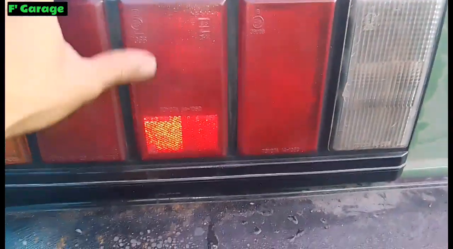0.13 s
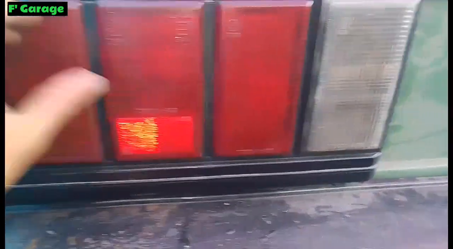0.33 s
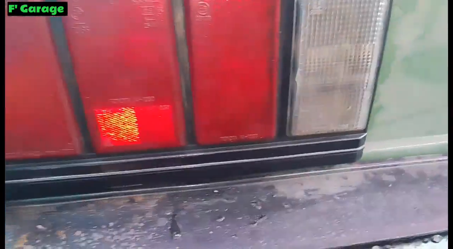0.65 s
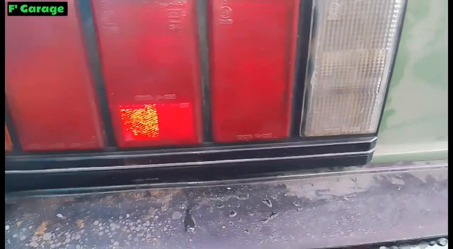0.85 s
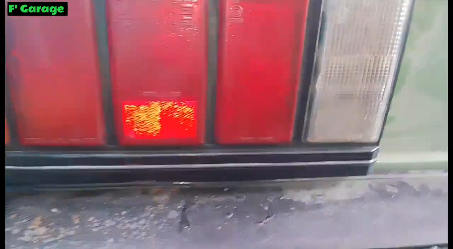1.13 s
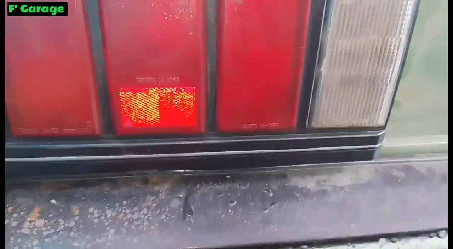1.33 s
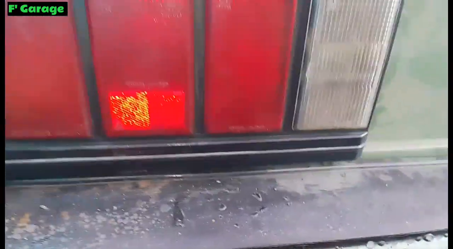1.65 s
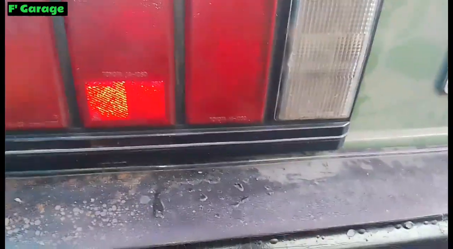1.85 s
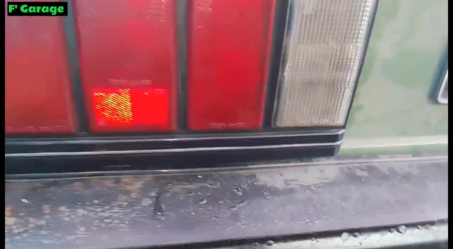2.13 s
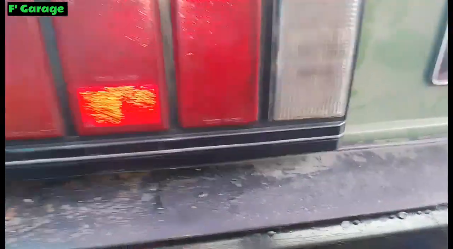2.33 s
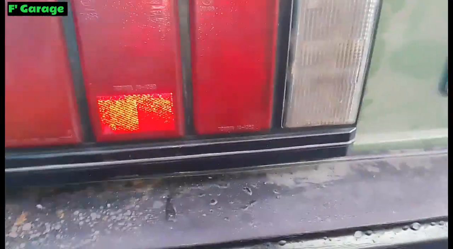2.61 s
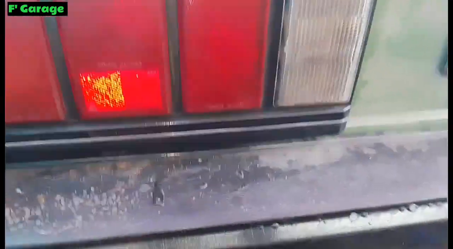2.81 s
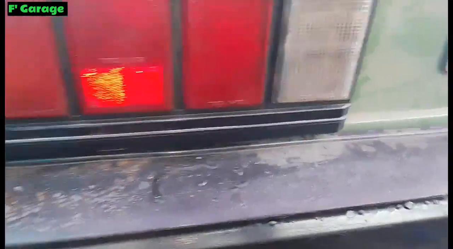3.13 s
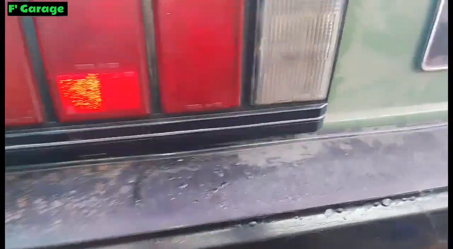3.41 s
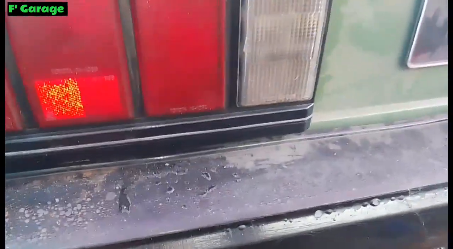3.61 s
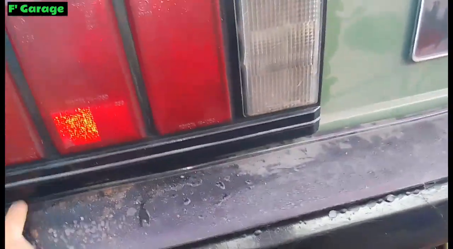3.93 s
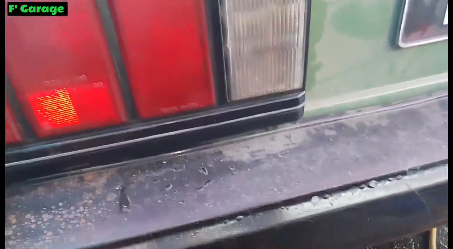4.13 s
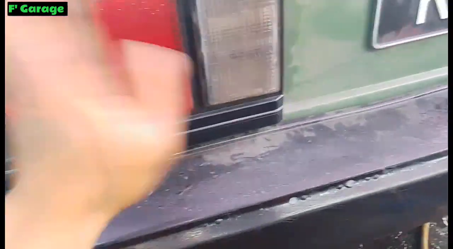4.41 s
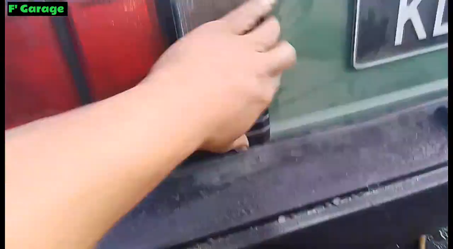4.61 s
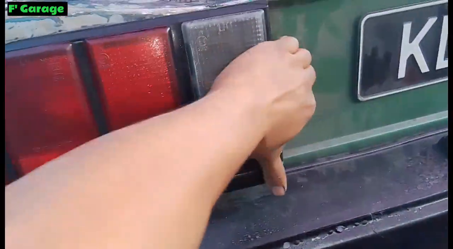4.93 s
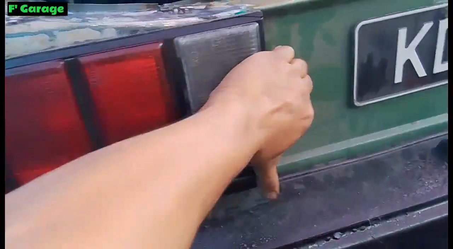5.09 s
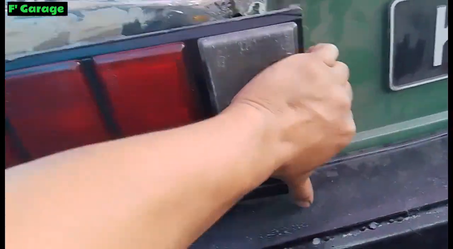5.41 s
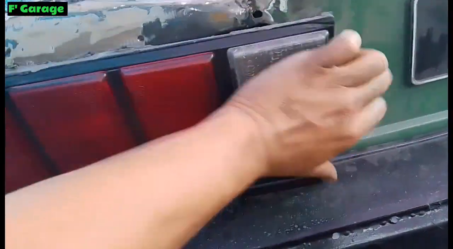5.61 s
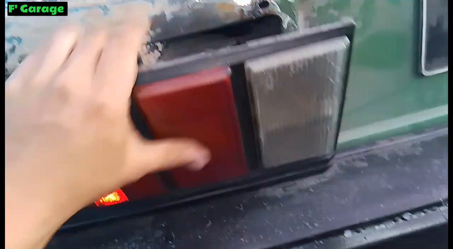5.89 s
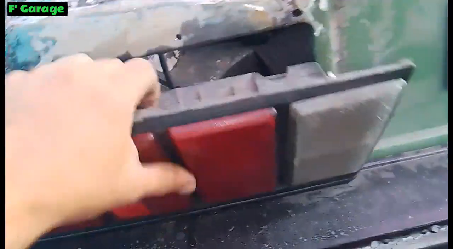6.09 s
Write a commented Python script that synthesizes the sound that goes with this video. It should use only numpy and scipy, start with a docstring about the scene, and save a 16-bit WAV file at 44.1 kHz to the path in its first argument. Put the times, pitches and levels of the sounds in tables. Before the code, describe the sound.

Close to the microphone, a hand knocks and prises a hollow plastic tail-light unit on a car's metal panel. Light clicks come first, then uneven clusters of sharp cracks, gritty creaks and dull bumps, busiest midway. After a quieter gap, another strong burst of creaks arrives, then only faint bumps and brushing. Short garage echoes follow the blows, over soft hiss and very faint low hum.

```python
"""Prising off a tail light

A hand knocks and prises at a plastic tail-light unit until it comes loose from a car's rear panel.
Clicks, creaks and bumps are runs of tiny slips that ring the lens, its housing and the sheet metal.
In between, the hand brushes softly: swells of grainy hiss. A garage echoes the blows with decaying noise.
Low wavering tones hum under a soft hiss, and the close microphone overloads on the hardest blows."""
import sys
import numpy as np
from scipy import signal
from scipy.fft import rfft, irfft
from scipy.io import wavfile
from scipy.ndimage import uniform_filter1d

SR = 44100
rng = np.random.default_rng(int(sys.argv[2]) if len(sys.argv) > 2 else 0)


def put_to_file(sound):
    """Save the sound as 16-bit audio at rate SR, in the file named by the first command-line argument."""
    columns = np.atleast_2d(sound).T  # one column per channel
    safe = np.clip(columns, -1, 1)
    whole_steps = np.round(safe * 32767)
    wavfile.write(sys.argv[1], SR, whole_steps.astype(np.int16))


N = 275832  # length of the scene in samples
TOP_HZ = 15300  # the highest pitch that gets through

# Colour of the steady hiss. Each row: pitch in Hz, relative level in dB per Hz.
AIR_COLOUR = [(30, 4), (100, -9.5), (160, -8.5), (400, -16.5), (750, -16.5), (1350, -23.5), (2050, -15),
              (2600, -26), (3200, -26), (4800, -18), (6400, -21), (7600, -33.5), (9500, -43),
              (15000, -47.5)]
AIR_DB = -47.5  # level of that hiss before it swells
# Low hum, like an engine idling far off. Each row: pitch in Hz, rms level in dB before it wavers.
HUM_TONES = [(23.7, -52), (47.5, -71), (71, -58.5), (143, -60.5)]
# How the garage rings in each pitch range. Each row: pitch in Hz, time to fall 60 dB in seconds,
# relative level in dB.
GARAGE_DECAY = [(100, 0.51, 1), (247, 0.3, 5), (680, 0.21, 5), (1870, 0.18, 2.5), (4900, 0.35, -7),
                (13000, 0.15, -0.5)]
# Soft strokes of the hand. Each row: middle in seconds, half length in seconds, level in dB,
# level of the fine top hiss in dB relative to the stroke.
BRUSH_STROKES = [(1.46, 0.058, -44, -34), (4.003, 0.03, -41.5, -18.5), (4.823, 0.029, -42.5, -27),
                 (4.983, 0.031, -34, -24), (5.804, 0.062, -50.5, -16), (6.007, 0.047, -58, -9)]
# Colour of the brushing. Each row: pitch in Hz, relative level in dB per Hz.
BRUSH_COLOUR = [(80, -11), (400, 5), (1000, -7.5), (1900, 3.5), (3000, -10.5), (5200, -0.5), (6600, -6.5),
                (8500, -28), (14000, -38)]
# Clearest ringing tones of the lamp unit in its panel. Each row: pitch in Hz, relative level in dB,
# time to fall 60 dB in seconds.
CLEAR_MODES = [(79.3, 1.5, 0.13), (154.3, -4, 0.19), (271.4, -12, 0.59), (336.2, 2, 0.13),
               (469, -13.5, 0.31), (564, -7, 0.073), (646, -7.5, 0.19), (760.2, -4.5, 0.097),
               (960, -13.5, 0.063), (1094, -47, 0.29), (1484, -20, 0.32), (1865, 6, 0.03), (1960, -4, 0.19),
               (2080, 2.5, 0.04), (2313, -14, 0.071), (3780, 0.5, 0.083), (4800, 5, 0.04),
               (4780, -4, 0.033), (4830, -8, 0.037), (5160, 5, 0.03), (4950, 9, 0.024), (5683, -5, 0.052),
               (6600, 7, 0.019)]
# Colour of its many overlapping short tones. Each row: pitch in Hz, relative level in dB per Hz.
DENSE_COLOUR = [(50, -19), (110, -3), (340, -1.5), (520, -9), (950, -4), (1200, -15), (1600, -8.5),
                (2100, -4.5), (2550, -15), (3300, -14), (4900, -5), (6700, -11), (8200, -22.5),
                (15000, -35.5)]
# Borders between thud, knock, clack, lens and snap. One column: pitch in Hz.
PART_EDGES_HZ = [45, 180, 450, 1300, 2900, 15500]
# How panel thud, shell knock, housing clack, lens and edge snap share a blow. Each row: share in dB,
# dB gained per dB of weight, most dB gained when the struck spot lies on the part.
PART_SHARES = [(-13.5, 1.1, 2.5), (-8, 0.86, 4), (-5.5, 0.36, 6), (-0.36, 0.0648, 2.5), (-2, 0, 0.5)]
SPOT_REACH_OCTAVES = 0.82  # how far from its own pitch a struck spot favours a part
# A blow lighter than a firm one is softer too, so more of it goes into the heavy parts.
FIRM_DB, SOFTENING_DB_PER_DB = -21.5, 0.3583
# Dull bumps of the hand, or of the unit settling on its seal. Each row: start in seconds,
# length in ms, pitch of the struck spot in Hz, level in dB before the parts share it.
DULL_BUMPS = [(0.636, 53, 196, -52), (1.092, 9.7, 456, -24.5), (1.826, 3.8, 1950, -34),
              (2.091, 13.7, 365, -40.5), (2.205, 2.4, 343, -32.5), (2.214, 24.5, 150, -37),
              (2.341, 7.4, 338, -33.5), (2.374, 3.8, 330, -28.5), (2.443, 5.9, 613, -22),
              (2.661, 12, 434, -43), (3.569, 14, 110, -20), (4.249, 3.2, 260, -35),
              (5.75, 26.4, 854, -40.5), (5.853, 20, 700, -45), (5.898, 3, 260, -51), (5.947, 2.8, 820, -49),
              (6.04, 3.1, 834, -49)]
BUMP_WEIGHT_DB, BUMP_SNAP_DB = 3.5, -8  # a padded contact pushes deep and hardly stirs the lens edges
# Creaks as the unit is prised along its mounts. Each row: start in seconds, length of slipping in ms,
# pitch of the struck spot in Hz, level in dB before the parts share it, weight of the hand in dB.
MOUNT_CREAKS = [(1.054, 22, 456, -20, 3), (1.068, 26, 1990, -12.5, -10.5), (1.578, 27.3, 368, -13.5, 1.5),
                (2.381, 14, 725, -28.5, 0), (2.395, 17.5, 2020, -9, -2), (2.417, 11, 636, -19, -4),
                (2.43, 7.2, 635, -15, -7), (2.512, 16.7, 380, -28, 5), (2.74, 11, 770, -18, 1),
                (2.833, 20, 330, -13, 0.5), (3.099, 19, 333, -19, 1), (3.212, 28, 290, -25, 0.5),
                (3.41, 42, 190, -22.5, 2.5), (3.457, 17, 2030, -14, 2), (3.537, 9, 900, -15, -11),
                (3.547, 19.8, 1920, -13, -1.5), (4.312, 12.4, 338, -18, 1.5), (4.984, 17, 800, -25.5, 0.5),
                (5.051, 7.6, 656, -14.5, 2), (5.216, 13, 680, -14, 3.5), (5.226, 29.6, 717, -12, 3),
                (5.252, 23.6, 620, -10, -1), (5.463, 21, 344, -29, -2.5)]
# Sharp clicks of plastic catching on an edge. Each row: start in seconds, pitch of the struck spot in Hz,
# level in dB before the parts share it, weight of the hand behind it in dB.
SHARP_CLICKS = [(0.271, 2020, -28, -8.5), (0.287, 620, -38.5, 0.5), (0.305, 1960, -30.5, -12),
                (0.315, 450, -45.5, 5.5), (1.196, 1980, -36, -1), (1.264, 1980, -40, 0.5),
                (1.548, 845, -32, 0), (1.572, 330, -25.5, 0.5), (2.504, 318, -24, 0),
                (2.545, 297, -22.5, -5.5), (2.702, 2120, -24.5, 0), (2.7304, 785, -13, 0.5),
                (2.756, 750, -18, 5.5), (2.8276, 885, -15.5, -11), (2.878, 345, -26, -6),
                (3.089, 344, -19.5, -4), (3.202, 230, -27.5, 1.5), (3.243, 720, -29.5, 2),
                (3.265, 595, -24, -17.5), (3.386, 815, -36, 6.5), (3.401, 785, -19, -25),
                (3.51, 940, -32, 9), (4.27, 320, -36, -2), (4.302, 402, -16.5, -9), (4.338, 550, -22, -1),
                (4.976, 760, -21.5, -0.5), (5.457, 610, -24.5, 2.5), (5.486, 350, -23.5, 0)]
CLICK_MS = 3.5  # a click is over after a few slips


def undb(db):
    """Turn decibels into a gain."""
    return 10 ** (np.asarray(db) / 20)


def rms(x):
    """Root mean square: the average strength of a sound."""
    return np.sqrt(np.mean(x ** 2) + 1e-18)


def lookup(hz, points):
    """Read between (Hz, value) points on a log-pitch axis."""
    f, value = np.transpose(points)
    return np.interp(np.log(np.maximum(hz, 1)), np.log(f), value)


def colour(x, points, size=2048):
    """Filter a sound to a given spectrum, with no sound ahead of its cause."""
    hz = np.arange(size // 2 + 1) * SR / size
    cepstrum = irfft(np.log(undb(lookup(hz, points))))
    # folding the cepstrum forward makes the filter minimum-phase
    cepstrum[1:size // 2] *= 2
    cepstrum[size // 2 + 1:] = 0
    impulse = irfft(np.exp(rfft(cepstrum)))
    return signal.fftconvolve(x, impulse)[:len(x)]


def band(lo_hz, hi_hz, order=3):
    """Make a filter that passes only the pitches between two limits."""
    return signal.butter(order, [lo_hz, min(hi_hz, SR / 2 - 1)], "band", fs=SR, output="sos")


def fade(t, t60):
    """Die away by 60 dB in t60 seconds."""
    return np.exp(-np.log(1000) * t / t60)


def walk(rate):
    """Smooth random drift with a spread near 1 and about `rate` new values a second."""
    k = int(SR / rate)
    steps = np.repeat(rng.standard_normal(N // k + 1), k)
    return uniform_filter1d(steps, k)[:N]


def add(out, start, sound):
    """Mix a sound in at its start time in seconds."""
    at = int(start * SR)
    piece = sound[:len(out) - at]
    out[at:at + len(piece)] += piece


def background(swell_db=2.9, waver_db=-5.0, wander_hz=0.38):
    """Soft, nearly steady coloured noise over low tones that drift in pitch and level."""
    air = colour(rng.standard_normal(N), AIR_COLOUR)
    air_level = undb(AIR_DB + swell_db * walk(4.1))
    air = air * air_level / rms(signal.sosfilt(band(123, TOP_HZ), air))
    hum = 0
    for hz, db in HUM_TONES:
        level = undb(db + waver_db * walk(5.7))
        phase = 2 * np.pi * np.cumsum(hz + wander_hz * walk(3.69)) / SR
        hum = hum + level * np.sin(phase)
    return air + np.sqrt(2) * hum  # a sine peaks at root 2 times its rms


def garage(count, wet_db=-9.5, build_s=0.00073, late_db=-27, late_t60=1.0):
    """Echo patterns, one a blow as hand and microphone move: they build up fast, and a faint tail lingers."""
    t = np.arange(int(0.6 * SR)) / SR
    edges = 40 * 2 ** np.arange(10)  # octave bands, Hz
    # each blow takes its own stretch of noise
    picks = rng.integers(0, N - len(t), count)[:, None] + np.arange(len(t))
    hz, *columns = np.transpose(GARAGE_DECAY)
    echoes = 0
    for lo, hi in zip(edges, edges[1:]):
        middle = np.log(lo * hi) / 2
        t60, db = (np.interp(middle, np.log(hz), column) for column in columns)
        decay = undb(db) * (fade(t, t60) + undb(late_db) * fade(t, late_t60))
        noise = signal.sosfilt(band(lo, hi), rng.standard_normal(N))
        echoes = echoes + noise[picks] * decay
    echoes = echoes * (1 - np.exp(-(t / build_s) ** 2))
    return undb(wet_db) * echoes / np.linalg.norm(echoes, axis=1, keepdims=True)


def brushing(grain_db=3, grain_rate=150, top_hz=8000):
    """Skin slides lightly: a grainy hiss swells and fades, with a finer hiss set for each stroke."""
    t = np.arange(N) / SR
    middle, half, db, top_db = np.transpose(BRUSH_STROKES)[:, :, None]
    strokes = undb(db) * np.exp(-((t - middle) / half) ** 2 / 2)
    grains = rng.standard_normal(N) * undb(grain_db * walk(grain_rate))
    hiss = colour(grains, BRUSH_COLOUR)
    top = signal.sosfilt(band(top_hz, TOP_HZ), grains)
    main_level = strokes.sum(axis=0)
    top_level = (strokes * undb(top_db)).sum(axis=0)
    return main_level * hiss / rms(hiss) + top_level * top / rms(top)


def slips(length, gap_s=0.0019, scatter_db=3.6, first_db=2, swell_db=3, easing_db=-3, size=48):
    """Force of one blow: a first click, then uneven slips that swell and ease off until the plastic grips."""
    gaps = gap_s * rng.gamma(3, 1 / 3, size)  # gap_s is the average gap
    when = np.cumsum(gaps) - gaps[0]
    pressure_db = swell_db * np.sin(np.pi * when / length) + easing_db * when / length
    strength = undb(pressure_db + scatter_db * rng.standard_normal(size))
    push = strength * rng.choice([-1, 1], size)
    push[0] = undb(first_db)
    keep = when <= length
    return np.bincount((when[keep] * SR).astype(int), push[keep])


def lamp_ring(force, t, crack_t60=0.019, body_t60=0.094, body_db=-9, modes_db=-8, place_db=1.0,
              detune=0.0039):
    """Slips set off a burst of many short tones, heard as coloured noise; the clear modes ring on."""
    ring_down = fade(t, crack_t60) + undb(body_db) * fade(t, body_t60)
    energy = np.abs(signal.fftconvolve(force ** 2, ring_down ** 2)[:len(t)])
    dense = colour(rng.standard_normal(len(t)) * np.sqrt(energy), DENSE_COLOUR)
    hz, db, t60 = np.transpose(CLEAR_MODES)[:, :, None]
    # every blow alters the modes' strength, pitch and direction a little
    weight, shift, sign = rng.standard_normal((3, len(CLEAR_MODES), 1))
    level = np.sign(sign) * undb(db + place_db * weight)
    tones = np.sin(2 * np.pi * hz * (1 + detune * shift) * t)
    answer = np.sum(level * fade(t, t60) * tones, axis=0)
    modes = signal.fftconvolve(force, answer)[:len(t)]
    return dense / rms(dense) + undb(modes_db) * modes / rms(modes)


def spot(x, hz, width_hz=110, width_share=0.0093, boost_db=5.5):
    """The struck spot flexes with a broad resonance of its own, damped more the higher it is."""
    peak = signal.iirpeak(hz, hz / (width_hz + width_share * hz), fs=SR)
    return x + undb(boost_db) * signal.lfilter(*peak, x)


def contact(x, length, snap_db, sheen_db=5.0, force_share=0.27, dulling_db_per_s=180):
    """Short, hard contacts reach the top octave; long, soft ones stay dull."""
    top_db = sheen_db + force_share * snap_db - dulling_db_per_s * length
    return colour(x, [(7000, 0), (9000, top_db)])


def shares(spot_hz, db, weight_db):
    """Level of each part: heavy or soft blows favour panel and shell, and the struck part speaks up."""
    share_db, per_weight, struck_db = np.transpose(PART_SHARES)
    centres = np.sqrt(np.multiply(PART_EDGES_HZ[:-1], PART_EDGES_HZ[1:]))
    nearness = np.exp(-(np.log2(centres / spot_hz) / SPOT_REACH_OCTAVES) ** 2)
    depth_db = weight_db + SOFTENING_DB_PER_DB * (FIRM_DB - db)
    return db + share_db + per_weight * depth_db + struck_db * nearness


def blow(slip_ms, spot_hz, db, weight_db, snap_db=0, ring_s=0.015):
    """A blow shares its energy between panel, shell, housing, lens and the lens edges."""
    length = slip_ms / 1000
    levels_db = shares(spot_hz, db, weight_db)
    levels_db[-1] += snap_db
    ring = lamp_ring(slips(length), np.arange(SR // 4) / SR)
    ring = spot(ring, spot_hz)
    ring = contact(ring, length, levels_db[-1])
    loud_part = int((length + ring_s) * SR)  # samples over which a level is set
    out = 0
    for lo, hi, level_db in zip(PART_EDGES_HZ, PART_EDGES_HZ[1:], levels_db):
        part = signal.sosfilt(band(lo, hi), ring)
        out = out + part * undb(level_db) / rms(part[:loud_part])
    return out


def bumps():
    """Padded contacts push deep, with little snap: (start, sound) pairs."""
    return [(start, blow(*bump, BUMP_WEIGHT_DB, BUMP_SNAP_DB)) for start, *bump in DULL_BUMPS]


def creaks():
    """Mounts slip and grip in quick runs: (start, sound) pairs."""
    return [(start, blow(*creak)) for start, *creak in MOUNT_CREAKS]


def clicks():
    """Plastic catches on an edge and slips briefly: (start, sound) pairs."""
    return [(start, blow(CLICK_MS, *click)) for start, *click in SHARP_CLICKS]


def scene():
    """Bumps, creaks and clicks, each close by and with its echoes, over brushing and background."""
    out = background() + brushing()
    blows = bumps() + creaks() + clicks()
    for (start, direct), echo in zip(blows, garage(len(blows))):
        add(out, start, direct)
        add(out, start, signal.fftconvolve(direct, echo))
    return out[None]


def record(dry, ceiling=0.77, order=8):
    """The microphone flattens the loudest peaks, and the top is cut."""
    clipped = dry / (1 + np.abs(dry / ceiling) ** order) ** (1 / order)
    low_pass = signal.firwin(255, TOP_HZ, window=("kaiser", 9), fs=SR)
    return signal.fftconvolve(clipped, low_pass[None], "same")


dry = scene()
out = record(dry)
put_to_file(out)
```